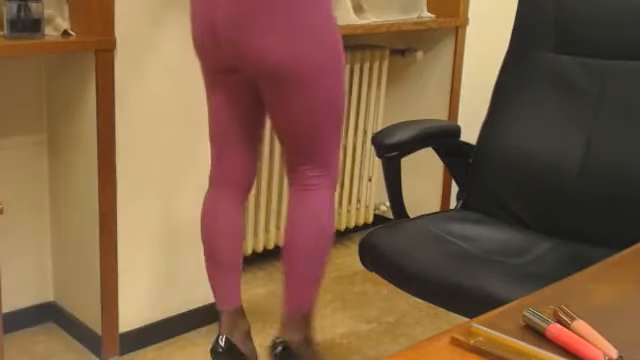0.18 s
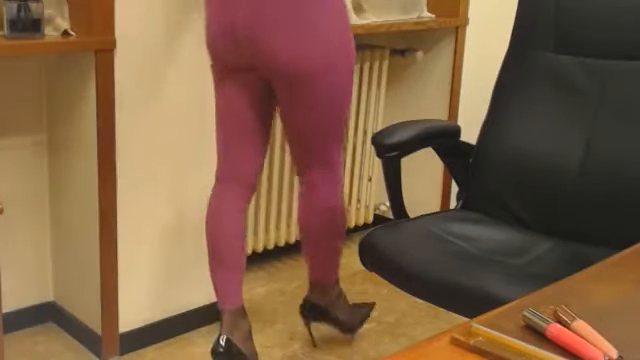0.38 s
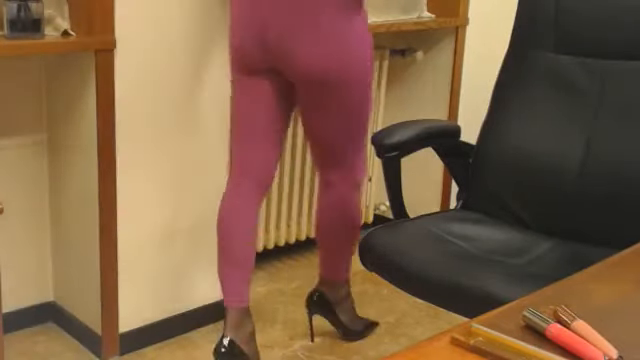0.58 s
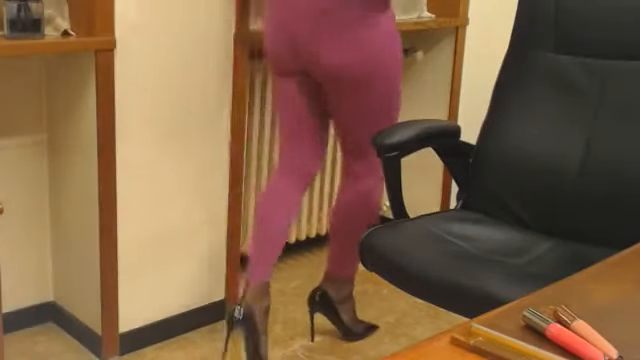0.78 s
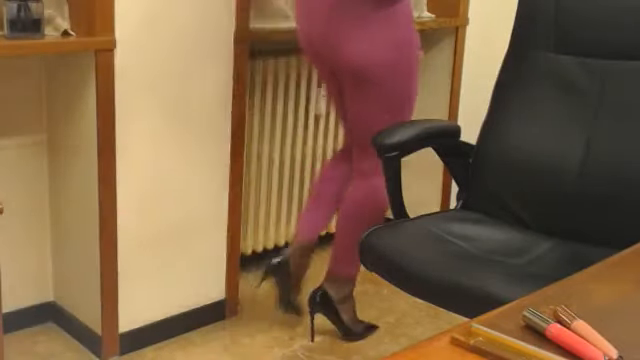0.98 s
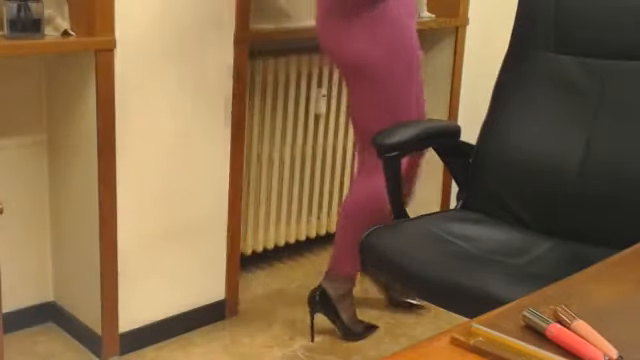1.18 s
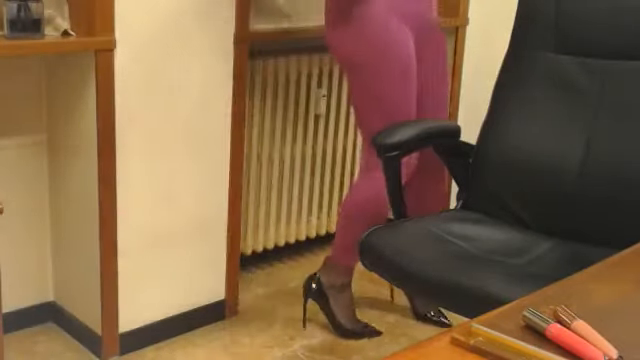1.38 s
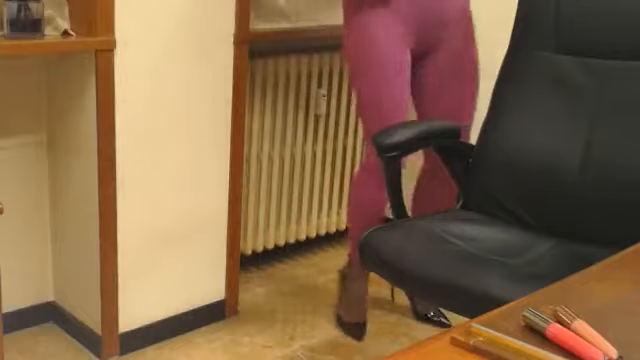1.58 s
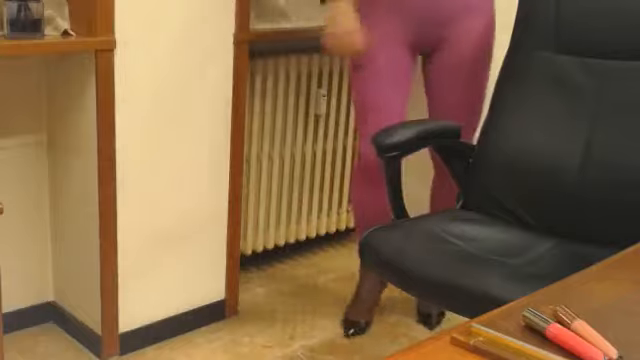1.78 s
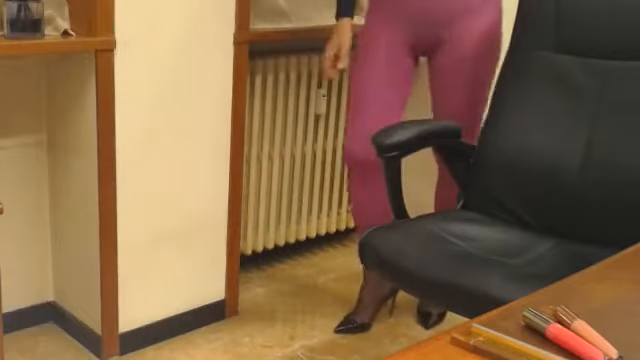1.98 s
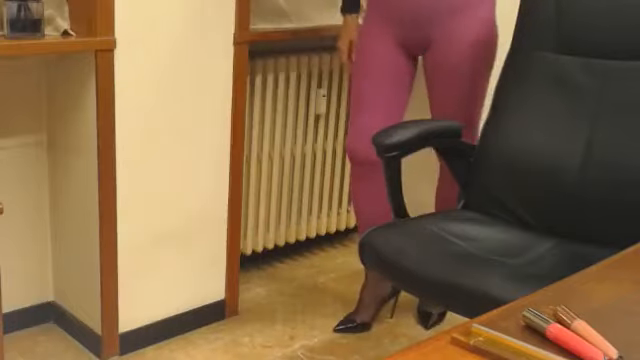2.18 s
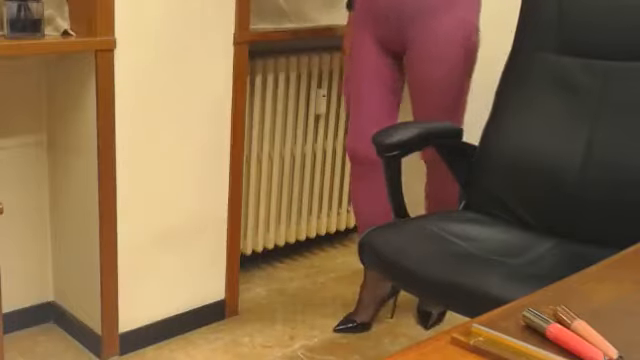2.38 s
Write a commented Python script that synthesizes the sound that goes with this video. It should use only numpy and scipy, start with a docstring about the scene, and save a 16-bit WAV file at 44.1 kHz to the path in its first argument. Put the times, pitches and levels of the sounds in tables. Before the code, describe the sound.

High-heeled shoes step and turn on the hard floor of a small, boxy office. A few uneven, hollow knocks and clicks come with light scuffs, nearby and slightly right, over soft clothing rustle and a faint hum.

```python
"""A sole scuffs and clothing rustles over faint room air, hum and a deep rumble.
Then someone in high heels steps and turns on the hard floor of a small office.
Each contact is a hollow knock of the shoe, a thud of the floor and a click of the tip,
answered by near walls and the room's modes."""
import sys
import numpy as np
from scipy import signal
from scipy.fft import rfft, irfft
from scipy.io import wavfile

SR = 44100
rng = np.random.default_rng(int(sys.argv[2]) if len(sys.argv) > 2 else 0)


def master(y):
    """Save y as 16-bit WAV."""
    cut = np.clip(np.atleast_2d(y).T, -1, 1)
    pcm = np.round(cut * 32767)  # scale
    wavfile.write(sys.argv[1], SR, pcm.astype(np.int16))


N = 105840
LEFT_EAR_LAG_S = .00007  # the walker is slightly to the right


def amp(db):
    """Decibels to gain."""
    return 10 ** (np.asarray(db) / 20)


def unit_rms(x):
    """Scale to rms 1."""
    return x / np.sqrt(np.mean(x ** 2) + 1e-20)


def at_hz(points, hz):
    """Read a table on a log-frequency axis."""
    freqs, values = np.transpose(points)
    return np.interp(np.log(hz), np.log(freqs), values)


def fader(points):
    """Gain over time from (s, dB) points."""
    return amp(np.interp(np.arange(N) / SR, *np.transpose(points)))


def band(x, hz, octaves, order=2):
    """Band-pass around a pitch."""
    half = 2 ** (max(octaves, .1) / 2)
    edges = [hz / half, min(hz * half, .48 * SR)]
    return signal.sosfilt(signal.butter(order, edges, "band", fs=SR, output="sos"), x + 1e-18)


def narrow_noise(hz, octaves):
    """Noise in one band, rms 1."""
    return unit_rms(band(rng.standard_normal(N + SR), hz, octaves)[SR:])


def add(out, x, start_s):
    """Mix a stereo sound in at a time."""
    i = int(start_s * SR)
    out[:, i:i + x.shape[1]] += x[:, :N - i]


# Stereo width of diffuse sound, narrow lows and wide highs: f/Hz, side over mid/dB
STEREO_WIDTH = [(30, -30), (60, -25), (125, -20), (250, -15), (500, -10), (1000, -4), (2000, 0), (4000, 1),
                (12000, 0.5)]


def diffuse_bands(size):
    """Half-octave bands of stereo noise, equal per Hz, alike in both ears in the bass."""
    white = rng.standard_normal((2, 2, size + SR // 4))
    for k, hz in enumerate(22 * 2 ** np.arange(0, 9.6, .5)):
        mid, side = band(white[k % 2], hz, 0.45)[:, -size:]
        width = amp(at_hz(STEREO_WIDTH, hz))
        yield hz, (mid + width * side * np.array([[1], [-1]])) / np.hypot(1, width)


def coloured_noise(spectrum):
    """Steady stereo noise of a given colour, rms 1."""
    return unit_rms(sum(amp(at_hz(spectrum, hz)) * x for hz, x in diffuse_bands(N)))


# Decay of the reverb tail: f/Hz, t60/s
TAIL_DECAY = [(100, 0.13), (300, 0.29), (600, 0.18), (1500, 0.23), (4000, 0.16), (10000, 0.31)]
# Standing waves that make the office boxy: f/Hz, relative level/dB, t60/s
OFFICE_MODES = [(98, -1.5, 0.24), (143.2, -2, 0.43), (196.4, -4, 0.36), (263, -3, 0.15),
                (301.6, -4.5, 0.29), (348.4, -3, 0.27), (413, 2.5, 0.26), (489.5, -0.5, 0.36),
                (575, -15, 0.21), (684.5, -2, 0.27), (810, -6.5, 0.17), (982, -7.5, 0.2)]
# Early reflections off walls and furniture, left and right in turn: delay/s, relative level/dB
REFLECTIONS = [(.0045, -11), (0.0105, -4), (.0300, -9), (.0500, -8.5), (.0690, -12)]


def room(reverb_db):
    """The path from one spot on the floor: direct sound, near echoes, room modes and a diffuse tail."""
    direct_db, modes_db, tail_rise_s, far_ear_lag_s = -8.5, -9.5, 0.0014, .00016
    t = np.arange(2 * SR // 3) / SR
    tail = sum(x * amp(-60 * t / at_hz(TAIL_DECAY, hz)) for hz, x in diffuse_bands(len(t)))
    tail = unit_rms(tail * (1 - np.exp(-t / tail_rise_s)))
    modes = sum(amp(db - 60 * t / t60) * np.cos(2 * np.pi * hz * t) for hz, db, t60 in OFFICE_MODES)
    path = amp(reverb_db) * (tail + amp(modes_db) * modes) / np.sqrt(len(t))
    path[[0, 1], [int(LEFT_EAR_LAG_S * SR), 0]] += amp(direct_db)
    for k, (delay_s, db) in enumerate(REFLECTIONS):
        for ear in (0, 1):
            arrival_s = delay_s + far_ear_lag_s * ((k + ear) % 2)
            path[ear, int(arrival_s * SR)] += amp(direct_db + db + reverb_db / 2)
    return path


# Soles scuffing the floor: t/s, level/dB, f/Hz, decay/s
SCUFF_CUES = [(0.0, -42.5, 4010, 0.016), (0.227, -33.5, 3930, 0.01), (0.233, -28.5, 1500, .008),
              (0.249, -40, 3170, .008), (0.280, -57.5, 6760, 0.079), (0.546, -56, 6200, 0.055),
              (0.652, -44, 2000, 0.013), (0.668, -47, 5500, 0.022), (0.701, -44, 2950, 0.014),
              (0.862, -60, 6500, 0.016), (1.368, -34, 1810, 0.031), (1.380, -49, 4930, 0.013),
              (1.425, -36, 2450, 0.0076), (1.551, -53, 5070, 0.035), (1.935, -59, 6000, 0.027),
              (2.140, -57, 6200, 0.03)]


def scuffs():
    """A sliding sole sheds a dying run of tiny slips: grit on top, a duller body below."""
    slips_per_s, attack_s = 11000, 0.0046
    out, t = np.zeros((2, N)), np.arange(SR // 4) / SR
    for start_s, db, hz, decay_s in SCUFF_CUES:
        slips = rng.standard_normal(len(t)) * (rng.random(len(t)) < slips_per_s / SR)
        grit = unit_rms(band(slips, hz, octaves=1.0, order=3))
        body = amp(-5) * unit_rms(band(slips, hz=894, octaves=0.74))
        envelope = np.minimum(t / attack_s, 1) * np.exp(-t / decay_s)
        stroke = amp(db) * (grit + body) * envelope
        add(out, signal.fftconvolve(stroke[None], room(reverb_db=-10), axes=1), start_s)
    return out


# Swells of the cloth: t/s, level/dB
CLOTH_SWELLS = [(0, -51.5), (.2, -78), (.5, -63), (.84, -58), (1.12, -67.5), (1.33, -57), (1.58, -54.5),
                (1.82, -53.5), (2.05, -56.5), (2.27, -63.5), (2.4, -68)]
# Soft tone of the cloth: f/Hz, relative level per Hz/dB
CLOTH_COLOUR = [(400, 11.5), (1200, -0.5), (2500, -5), (5000, -5), (8000, -12), (11000, -17),
                (15000, -37.5)]


def clothing():
    """Soft, uneven rustle of fabric that swells as the legs turn, heard directly and off the walls."""
    direct_share, flutter_db = 0.3, 0.9
    flutter = amp(flutter_db * narrow_noise(hz=9, octaves=1.5))  # folds catch and let go
    near = coloured_noise(CLOTH_COLOUR)[0]
    direct = np.array([np.roll(near, int(LEFT_EAR_LAG_S * SR)), near])
    reflected = coloured_noise(CLOTH_COLOUR)
    rustle = np.sqrt(direct_share) * direct + np.sqrt(1 - direct_share) * reflected
    return fader(CLOTH_SWELLS) * flutter * rustle


# Faint hum tones: f/Hz, level/dB
HUM_TONES = [(128, -55), (194, -62.5), (294, -57)]
# Dark bed of room air: f/Hz, relative level per Hz/dB
AIR_COLOUR = [(25, -4), (60, -9.5), (100, -9.5), (135, -15.5), (190, -14.5), (300, -5.5), (400, -18),
              (650, -17.5), (900, -18.5), (1400, -26), (2800, -36), (5600, -56.5), (9000, -48.5),
              (15000, -66.5)]
# One slow swell of deep rumble: t/s, level/dB
RUMBLE_SWELL = [(0, -74), (.35, -52), (.7, -48.5), (1.1, -54.5), (1.6, -57), (2.0, -63), (2.4, -73)]


def room_tone():
    """Room air, a few wavering hum tones and a deep rumble."""
    hum_width_hz = 17.7
    hum = sum(amp(db) * narrow_noise(hz, np.log2(1 + hum_width_hz / hz)) for hz, db in HUM_TONES)
    air = amp(-48) * coloured_noise(AIR_COLOUR)
    rumble = fader(RUMBLE_SWELL) * narrow_noise(hz=34, octaves=0.64)
    return air + hum + rumble


def settling_tip(t):
    """Force of a tip settling on grit: a push smeared over a few milliseconds, even at all pitches."""
    crunch_decay_s, crunch_over_push_db = 0.004, 5
    grit = rng.standard_normal(len(t)) * np.exp(-t / crunch_decay_s)
    crunch = amp(crunch_over_push_db) * grit / np.linalg.norm(grit)
    spectrum = rfft(signal.unit_impulse(len(t)) + crunch, 2 * len(t))
    return irfft(spectrum / np.abs(spectrum))[:len(t)]


def impact(force, db, hz, octaves, order=3):
    """A contact force ringing briefly in one damped resonance."""
    return amp(db) * unit_rms(band(force, hz, octaves, order=order))


# Modes of the thin heel: f/Hz, level over the snap/dB, t60/s
HEEL_PARTIALS = [(1170, 1.5, 0.063), (1350, -3, 0.058), (2480, 3.5, 0.029), (3040, 1.5, .03),
                 (3756, -2.5, 0.04)]


def heel_ring(force, snap_db):
    """The thin heel rings briefly when its tip snaps down."""
    t, ring = np.arange(len(force)) / SR, np.zeros(len(force))
    for hz, db, t60 in HEEL_PARTIALS:
        mode = amp(-60 * t / t60) * np.sin(2 * np.pi * hz * t)
        ring += amp(snap_db + db) * unit_rms(signal.fftconvolve(force, mode)[:len(t)])
    return ring


# Heel and sole hits: t/s, knock level/dB, knock f/Hz, knock width/octaves, thud level/dB, thud f/Hz,
# click level/dB, click f/Hz, snap level/dB, reverb send/dB
STEP_CUES = [ (0.2390, -34, 1228, 0.46, -63, 245, -42.5, 2370, -51, -9),
             (0.2407, -27.5, 566, 0.42, -47, 238, -41, 1145, -53, -15.5),
             (0.247, -33, 823, 0.66, -57, 240, -51, 2300, -58, -15),
             (0.2785, -30, 638, 0.42, -34, 285, -52.5, 2330, -82, 0.5),
             (0.2920, -27.5, 460, 1.5, -21.5, 256.5, -55.5, 1150, -70.5, -3),
             (0.3120, -28.5, 683, 0.98, -28.5, 223, -56.5, 1236, -65.5, -3),
             (0.3275, -24, 374, 0.59, -40.5, 251, -46.5, 950, -67, -9.5),
             (0.3620, -31.5, 520, 0.92, -24.5, 250, -62.5, 1290, -66.5, -11.5),
             (0.4180, -45.5, 417, 0.98, -34.5, 292, -75, 1246, -80, -20),
             (0.5453, -27, 399, 0.73, -42, 259, -45, 1030, -66.5, -5),
             (0.5573, -25, 542, 0.53, -28.5, 237.4, -59, 2120, -75.5, -4.5),
             (0.5725, -30.5, 610, 0.44, -53.5, 200, -62.5, 1400, -76, -5.5),
             (0.5900, -31.5, 487, 0.32, -37, 140, -65.5, 1400, -78, -8.5),
             (0.6490, -38, 580, 0.73, -44.5, 240, -70, 1910, -68, -4),
             (0.6620, -35.5, 750, 0.7, -46, 268, -54.5, 1890, -71, -6),
             (0.6728, -41, 770, 0.9, -50, 313, -50.5, 1450, -63, -1),
             (1.3664, -58, 1190, 0.54, -72, 250, -52.5, 2140, -67.5, -2),
             (1.4229, -23.5, 497, 0.65, -42.5, 272, -49, 1430, -63, -9.5),
             (1.4346, -29.5, 528, 0.76, -47, 213, -42.5, 1260, -75, -5),
             (1.9320, -30, 575, 0.87, -48.5, 276, -47.5, 1390, -73, -1.5),
             (1.9430, -33, 634, 0.96, -44.5, 268, -69, 1600, -85, -1),
             (1.9930, -34, 700, 0.54, -43, 250, -70, 1420, -77, -10),
             (2.1561, -41, 914, 0.45, -48, 442, -53.5, 1590, -73, 0),
             (2.188, -43.5, 900, 0.67, -40, 152, -63, 1590, -70, -14)]


def footsteps():
    """A clean push thumps the floor while the settling tip sounds the shoe; the room answers both."""
    out, t = np.zeros((2, N)), np.arange(int(.05 * SR)) / SR
    push = signal.unit_impulse(len(t))
    for (start_s, knock_db, knock_hz, knock_octaves, thud_db, thud_hz,
         click_db, click_hz, snap_db, reverb_db) in STEP_CUES:
        tip = settling_tip(t)
        knock = impact(tip, knock_db, knock_hz, knock_octaves)
        thud = impact(push, thud_db, thud_hz, octaves=0.95)
        boom = impact(push, thud_db - 14.5, hz=86, octaves=2.03, order=2)  # the floor's deep give
        click = impact(tip, click_db, click_hz, octaves=0.81, order=4)
        snap = impact(tip, snap_db, hz=3620, octaves=0.7, order=5)
        contact = knock + thud + boom + click + snap + heel_ring(tip, snap_db)
        add(out, signal.fftconvolve(contact[None], room(reverb_db), axes=1), start_s)
    return out


def scene():
    """The walker, slightly to the right, over the room tone."""
    pan = amp([[-.4], [.4]])
    return (footsteps() + scuffs()) * pan + clothing() + room_tone()


def record(dry):
    """A steep high cut takes off the very top."""
    stop_hz = 16150
    return signal.sosfiltfilt(signal.cheby2(20, 50, stop_hz, fs=SR, output="sos"), dry)


dry = scene()
out = record(dry)
master(out)
```